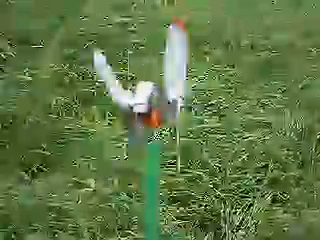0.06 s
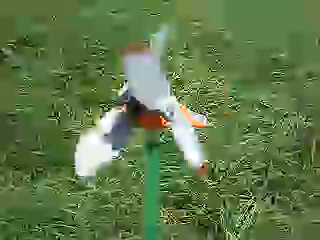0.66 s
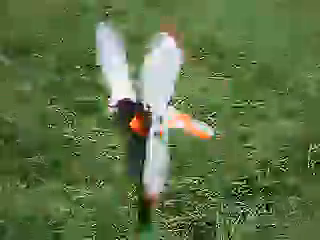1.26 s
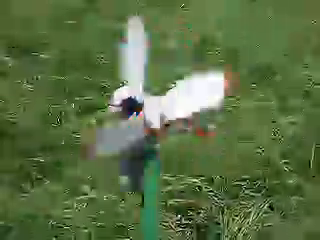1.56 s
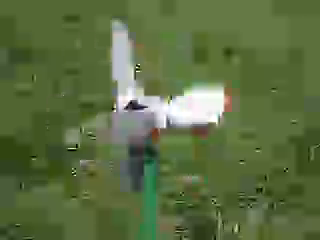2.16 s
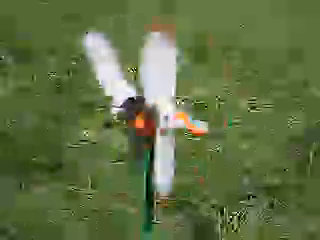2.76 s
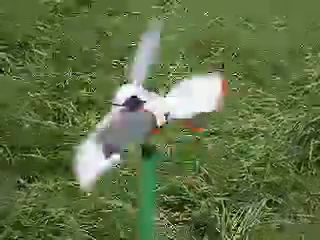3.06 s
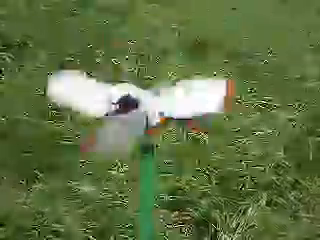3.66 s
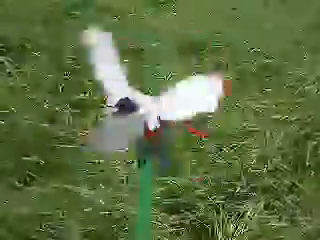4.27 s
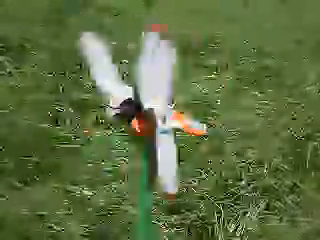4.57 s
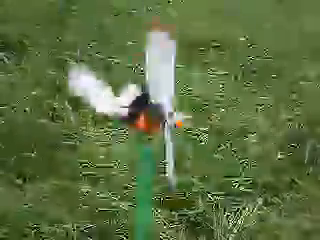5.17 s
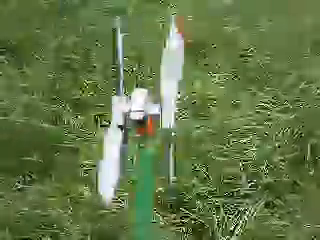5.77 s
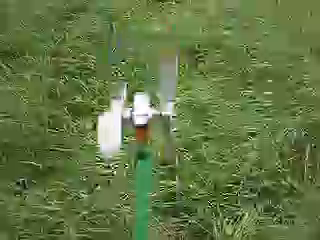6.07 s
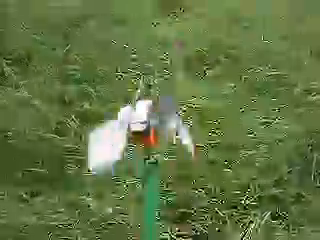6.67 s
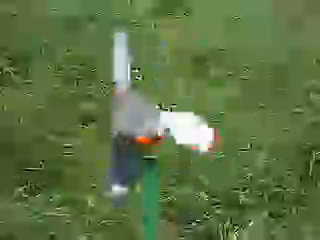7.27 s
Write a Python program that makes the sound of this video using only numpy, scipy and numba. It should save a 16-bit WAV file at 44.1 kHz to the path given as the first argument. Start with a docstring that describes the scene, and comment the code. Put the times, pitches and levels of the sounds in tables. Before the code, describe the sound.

Wind buffets the microphone in a garden from the start, with low thumps and a hard gust at about 0.4 seconds, over a steady airy hiss. From 0.8 seconds a wooden whirligig just in front begins to clack as its two loose propellers knock on their axles. The clacks are small, dry and irregular, often bunched, some slightly hollow, with a faint rattling chatter between them. More gusts hit between 1.5 and 2 seconds. The clacking grows busier from about 2.5 seconds while the wind builds to another strong burst around 3.6 seconds. The strongest gusts briefly push everything else down. After 4 seconds the wind eases and the quick clacks continue, sounding sharpest near 6 seconds. They then become sparser, with a few light puffs of wind and the hiss, until the end at about 7.4 seconds.

```python
"""A wooden whirligig spins on a stake in a garden. From the start, gusts and single eddies buffet the
microphone over a steady hiss. From 0.8 s the hubs of two loose propellers knock on their axles:
small dry clacks, often in bunches, amid a chatter of tiny slips. After 4 s the wind eases and the
clacks go on, hardest-edged near 6 s as the whirligig swings head-on. Throughout, the camera's
limiter ducks everything under the strongest gusts."""
import sys
import numpy as np
from scipy import signal
from scipy.fft import rfft, irfft
from scipy.io import wavfile
from scipy.ndimage import uniform_filter1d
from numba import njit

SR = 44100
rng = np.random.default_rng(int(sys.argv[2]) if len(sys.argv) > 2 else 0)


def wav_record(signal):
    """Record a signal, one row per channel, as 16-bit PCM in the file named by sys.argv[1]."""
    frames = np.transpose(np.atleast_2d(signal))
    bounded = np.clip(frames, -1, 1)
    # unit amplitude maps onto the largest positive 16-bit level
    quanta = np.round(bounded * 32767).astype(np.int16)
    wavfile.write(sys.argv[1], SR, quanta)


N = 326781

# hub hits on the axle: t/s, level/dB, hollow ring near 2 kHz/dB
KNOCKS = [(.7906, -36, 7), (0.9574, -31.5, -4), (1.0406, -36, 10), (1.526, -30, 15), (1.6072, -31.5, 1),
          (1.7499, -35, 10), (1.8007, -30.5, -2), (1.8224, -29, -12), (1.8334, -31, -3), (1.9836, -32, 7),
          (2.0937, -27, 3), (2.2407, -31.5, 8), (2.487, -29, -3), (2.5042, -26, -11), (2.5443, -29, 5.5),
          (2.606, -32, -16), (2.6823, -28.5, 1), (2.723, -28.5, 1), (2.7557, -30, 3), (2.8545, -28, 1),
          (2.8726, -24, -13), (2.906, -32.5, 7), (2.9297, -25, -16), (2.9817, -29, -8), (3.085, -32, 7),
          (3.152, -27, 0), (3.172, -27, -3), (3.1931, -22, 1), (3.275, -24, -7), (3.2873, -29, -14),
          (3.328, -31, -10), (3.3393, -25.5, -5), (3.434, -27.5, -7), (3.4498, -26.5, -1),
          (3.528, -25.5, -7), (3.552, -32.5, 9), (3.6027, -26.5, 4), (3.771, -34, 4), (3.9354, -31, 5),
          (4.124, -29.5, 1), (4.293, -31.5, 3), (4.317, -28, 6), (4.354, -30, 6), (4.3797, -25, 0.5),
          (4.3994, -29.5, 7), (4.459, -36, 16), (4.5115, -25.5, 1), (4.5362, -24.5, -5),
          (4.6317, -32.5, 11), (4.6597, -33, -12), (4.6855, -25, -6.5), (4.8095, -33.5, 4),
          (4.864, -30, -2), (4.8755, -22, -4.5), (4.909, -27, 3), (4.989, -26, -13), (5.0358, -27.5, -2),
          (5.049, -27, -6), (5.067, -29, -8), (5.1338, -31.5, -5), (5.1744, -27, -3), (5.194, -27.5, -4),
          (5.206, -29.5, -15), (5.2448, -28.5, -28), (5.2865, -34, -8), (5.306, -32.5, -6),
          (5.363, -34, -7), (5.4132, -32.5, -10), (5.44, -30, -1), (5.4514, -35, -6), (5.5057, -31.5, -17),
          (5.577, -29, -9), (5.593, -25, -2), (5.6746, -31.5, 0), (5.7538, -27, -12), (5.7768, -27, -2),
          (5.8183, -28.5, -8), (5.8416, -29, -12), (5.9148, -32, -5), (5.9384, -28, -4),
          (5.9603, -25.5, -9), (6.048, -31, -8), (6.1097, -27.5, -7), (6.2997, -33, -8), (6.363, -37, 4),
          (6.4073, -31, -9), (6.5111, -32.5, -12), (6.778, -33.5, 10), (6.7924, -31.5, -4),
          (7.011, -30, -5), (7.249, -31.5, 2), (7.2694, -25.5, 1), (7.2815, -34, 6), (7.3941, -34, 0)]
# blade and hub modes: f/Hz, level/dB, t60/s
WOOD_MODES = [(1316, 4, 0.018), (1980, 3, 0.14), (2155, 8, 0.05), (2713, 5, 0.074), (3100, -58, 0.037),
              (3620, -1.5, 0.16), (4107, 7.5, 0.055), (4760, 8, 0.017), (5560, 4, 0.06),
              (6420, -11.5, 0.0036), (7080, 15, 0.0022), (9430, 4, 0.0011), (10800, -3, 0.0031)]


def undb(db):
    return 10 ** (np.asarray(db) / 20)


def unit_rms(x):
    return x / np.sqrt(np.mean(x ** 2) + 1e-20)


def curve(rows):
    """Join (t/s, value) rows linearly."""
    return np.interp(np.arange(N) / SR, *np.transpose(rows))


def add(out, start_s, x):
    """Mix x into out from start_s on."""
    i = int(start_s * SR)
    x, i = x[max(-i, 0):], max(i, 0)
    out[i:i + len(x)] += x[:max(N - i, 0)]


def colour(x, points):
    """Filter by (f/Hz, level/dB) points."""
    hz, db = np.transpose(points)
    bins_hz = np.maximum(np.fft.rfftfreq(len(x), 1 / SR), 1)
    return irfft(rfft(x) * undb(np.interp(np.log(bins_hz), np.log(hz), db)), len(x))


def wander(rate_hz):
    """Twice-smoothed random steps, rms 1."""
    hold = int(SR / rate_hz)
    steps = np.repeat(rng.standard_normal(N // hold + 1), hold)
    return unit_rms(uniform_filter1d(uniform_filter1d(steps, hold), hold)[:N])


@njit
def lowpass(x, corner_hz, damping):
    """State-variable low-pass, moving corner."""
    y, band_state, low_state = np.empty(len(x)), 0., 0.
    for i in range(len(x)):
        g = np.tan(np.pi * corner_hz[i] / SR)
        band = (band_state + g * (x[i] - low_state)) / (1 + g * (g + damping))
        y[i] = low_state + g * band
        band_state, low_state = 2 * band - band_state, 2 * y[i] - low_state
    return y


@njit
def envelope(x, attack_s, release_s):
    """Attack/release follower of |x|."""
    y, level = np.empty(len(x)), 0.
    for i in range(len(x)):
        lag_s = attack_s if abs(x[i]) > level else release_s
        level += (abs(x[i]) - level) / (SR * lag_s)
        y[i] = level
    return y


def mic_low_cut(x, corner_hz=130, q=2):
    """Microphone bass cut; rings a cycle or two after each push."""
    w = 2 * np.pi * corner_hz
    x = signal.lfilter(*signal.butter(1, 40, "high", fs=SR), x)
    return signal.lfilter(*signal.bilinear([1, 0, 0], [1, w / q, w * w], SR), x)


def gust_level_db(swell_s=0.01, fade_s=0.02):
    """Each puff swells, holds and fades; its power adds to the breeze."""
    # puffs at the microphone: t/s, hold/s, level/dB
    puffs = [(0, 0.051, -15.5), (0.068, 0.14, -32.5), (0.357, .06, -31), (0.437, 0.025, -8.5),
             (0.637, 0.02, -28), (0.757, 0.065, -37), (1.213, 0.031, -29), (1.326, 0.041, -27),
             (1.46, 0.053, -31.5), (1.538, 0.027, -19), (1.618, 0.039, -15), (1.8, 0.057, -30.5),
             (1.906, 0.032, -21.5), (2.158, 0.079, -28), (2.29, 0.16, -22.5), (2.561, 0.041, -23.5),
             (2.75, 0.023, -21.5), (2.83, 0.028, -27.5), (3.068, 0.088, -16.5), (3.184, 0.078, -17.5),
             (3.368, 0.024, -19), (3.508, 0.037, -18.5), (3.561, 0.079, -10.5), (3.726, 0.054, -16.5),
             (3.968, 0.074, -22.5), (4.13, .035, -26), (4.622, 0.04, -28.5), (5.871, 0.1, -32.5),
             (6.22, .08, -32.5), (6.338, 0.041, -26.5), (6.53, 0.013, -32), (7.018, .025, -34),
             (7.117, .025, -37.5), (7.272, 0.011, -38)]
    # breeze between puffs: t/s, level/dB
    breeze = [(0, -50), (.7, -37.5), (.9, -47.5), (1.12, -40), (1.22, -35.5), (1.85, -37), (2.08, -45),
              (2.4, -30), (2.68, -39.5), (3, -45.5), (3.6, -26), (4.2, -38.5), (4.38, -50.5), (5.75, -51.5),
              (5.95, -44.5), (6.7, -44), (7.41, -45)]
    t, power = np.arange(N) / SR, undb(curve(breeze)) ** 2
    for start_s, hold_s, db in puffs:
        shape = np.exp(-np.maximum(start_s - t, 0) / swell_s - np.maximum(t - start_s - hold_s, 0) / fade_s)
        power += (undb(db) * shape) ** 2
    return 10 * np.log10(power)


def wind(corner_hz=235, roar_above_db=-18, flutter_db=2.5, gain_db=-1):
    """Turbulence at the microphone port: a low flutter; hard gusts break into small eddies and roar."""
    level_db = gust_level_db()
    fineness = 0.12 * np.clip(level_db - roar_above_db, 0, 6) + .23 * wander(60)
    cutoff_hz = np.clip(corner_hz * np.exp(fineness), 40, 2000)
    eddies = colour(rng.standard_normal(N),
                    [(20, -12), (70, 7.5), (130, -3), (220, -2), (400, -4.5), (1000, -4)])
    for _ in range(2):
        eddies = lowpass(eddies, cutoff_hz, np.sqrt(2))
    pressure = mic_low_cut(eddies)
    pressure /= np.sqrt(uniform_filter1d(pressure ** 2, size=1100) + 1e-12)  # 25 ms rms
    return pressure * undb(level_db + flutter_db * wander(70) + gain_db)


def hiss():
    """Even hiss of garden air and microphone."""
    # noise shape: f/Hz, level/dB
    spectrum = [(25, -5), (50, 16.5), (95, -25), (128, 13), (165, -10), (250, 6), (500, 5.5), (1000, 2),
                (1700, -2.5), (3500, -3.5), (6500, -2), (9500, -6.5), (12500, -16.5), (15500, -29)]
    # slow drift: t/s, level/dB
    levels = [(0, -45), (.3, -42.5), (2.5, -42.5), (3.4, -43), (3.9, -45), (5.7, -43), (6.3, -42.5),
              (7.41, -42.5)]
    return unit_rms(colour(rng.standard_normal(N), spectrum)) * undb(curve(levels))


def buffets():
    """An eddy slaps the microphone: one smooth pressure bump, shorter at higher pitch."""
    # single eddies: t/s, peak level/dB, nominal f/Hz
    eddies = [(.003, -9, 264), (0.018, -6, 150), (.044, -10.5, 170), (.432, -1.5, 200), (.438, 4.5, 340),
              (.452, 5, 272), (.642, -10, 238), (0.763, -15, 154), (0.824, -21, 175), (1.251, -19.5, 150),
              (1.374, -17, 165), (1.539, -13.5, 150), (1.623, -11.5, 190), (1.909, -1.5, 352),
              (2.181, -13.5, 161), (3.075, -21, 165), (3.123, -10, 195), (3.202, -5.5, 197),
              (3.393, -14, 197), (3.563, 0.5, 244), (3.643, -10, 240), (3.664, 0, 280), (3.732, -5, 227),
              (4.057, -12.5, 170), (4.124, -11, 155), (4.645, -18, 130), (5.958, -11, 246),
              (6.342, -16, 252), (6.375, -18.5, 200), (7.04, -21, 145)]
    out, t = np.zeros(N), np.arange(-600, 2400) / SR
    for at_s, db, hz in eddies:
        bump = mic_low_cut(np.exp(-.5 * (t * max(hz, 100) / .235) ** 2))
        add(out, at_s + t[0], undb(db) * bump / np.abs(bump).max())
    return out


def wood_response(force, mode_gains_db, mode_ratios, wood_db):
    """Dry crack of a contact plus the wooden modes it drives."""
    # contact crack: f/Hz, level/dB
    spectrum = [(400, -18), (1200, -5), (2000, -1), (4000, 0), (6700, 2), (8500, -1), (10000, -3),
                (12000, -9), (14000, -16), (16000, -22)]
    crack, wood = colour(force, spectrum), 0
    for (hz, db, t60_s), extra_db, ratio in zip(WOOD_MODES, mode_gains_db, mode_ratios):
        pole = np.exp((2j * np.pi * hz * ratio - np.log(1000) / t60_s) / SR)
        mode = np.sqrt(1 - abs(pole) ** 2) * signal.lfilter([1], [1, -pole], crack).imag
        wood += undb(db + extra_db) * mode
    return undb(wood_db) * unit_rms(wood) + unit_rms(crack)


def shifting_spots(x, spread_db=4, rate_hz=120):
    """Slips land on changing spots of the wood: six band levels wander."""
    spectrum, out = rfft(x), 0
    band = np.digitize(np.fft.rfftfreq(N, 1 / SR), [2400, 3400, 4800, 6600, 9200])
    for k in np.unique(band):
        out += irfft(spectrum * (band == k), N) * undb(spread_db * wander(rate_hz))
    return out


def chatter(slips_per_s=190, slip_s=.0012, scatter_db=3, rattle_db=-14.5, gain_db=-4.5):
    """Tiny uneven slips of the hubs on their axles, swelling to a short rattle at each knock."""
    # chatter as the propellers speed up and slow down: t/s, level/dB
    levels = [(0, -57), (1.5, -45.5), (2.4, -48.5), (2.85, -40), (3.45, -47), (4.05, -57), (4.35, -44.5),
              (4.8, -47.5), (5.9, -51.5), (6.9, -45.5), (7.41, -54)]
    strength, t = undb(curve(levels)), np.arange(-SR // 10, SR // 2) / SR
    rattle = np.exp(np.minimum(t / 0.004, -t / 0.022))  # 4 ms rise, 22 ms decay
    for at_s, db, _ in KNOCKS:
        add(strength, at_s + t[0], undb(db + rattle_db) * rattle)
    onsets = rng.random(N) < slips_per_s / SR
    slips = onsets * undb(scatter_db * np.minimum(rng.exponential(size=N), 2.5))
    force = signal.lfilter([1], [1, -np.exp(-1 / (slip_s * SR))], slips) * rng.standard_normal(N)
    scrapes = wood_response(force, np.zeros(len(WOOD_MODES)), np.ones(len(WOOD_MODES)), wood_db=-2)
    return unit_rms(shifting_spots(scrapes)) * strength * undb(gain_db)


def knocks(contact_s=0.00073, bounce_db=-8, tail_db=-19, spot_db=2.6, spot_detune=.028, gain_db=-4):
    """A hub hits its axle, scrapes and bounces; each spot rings the modes differently."""
    # swing round the stake: t/s, facing (0 side-on, 1 head-on)
    facing = [(0, 0.61), (1.2, 0.55), (3.3, 0.084), (4.8, 0.36), (5.6, 0.86), (6.6, 0.9), (7.41, 0.16)]
    out, t = np.zeros(N), np.arange(-128, 2944) / SR
    tail = undb(tail_db) * (t > 0) * np.exp(-t / .008)
    for at_s, db, hollow_db in KNOCKS:
        bounce_s = rng.uniform(0.0023, 0.00585)
        hit, bounce = (np.maximum(t - delay_s, 0) / contact_s for delay_s in (0, bounce_s))
        contact = hit * np.exp(1 - hit) + undb(bounce_db) * bounce * np.exp(1 - bounce)
        force = rng.standard_normal(len(t)) * (contact + tail)
        spot, stretch = rng.standard_normal((2, len(WOOD_MODES)))
        clack = wood_response(force, spot_db * spot, 1 + spot_detune * stretch, wood_db=1.5)
        # flat hits bring out the hollow body; the hard edge carries best head-on
        body_db, middle_db = 2.5 + 0.37 * hollow_db, -.25 * hollow_db
        edge_db = 11 * np.interp(at_s, *np.transpose(facing))
        clack = colour(clack, [(2200, hollow_db), (2600, body_db), (4300, body_db), (5200, middle_db),
                               (7200, middle_db), (8500, edge_db), (10000, edge_db), (14000, edge_db - 6)])
        peak_rms = np.sqrt(uniform_filter1d(clack ** 2, size=132).max())  # 3 ms window
        add(out, at_s + t[0], clack * undb(db + gain_db) / peak_rms)
    return out


def scene():
    """Wind and hiss at the microphone, the whirligig just in front; mono."""
    return (wind() + hiss() + buffets() + chatter() + knocks())[None]


def record(dry):
    """The camera limits and clips the gusts, notches the treble and cuts the top."""
    # narrow treble dip: f/Hz, level/dB
    notch = [(7100, 0), (7500, -4), (7730, -10), (7850, -23), (7980, -10), (8250, 0)]
    threshold_db, ceiling, top_hz = -10.5, .707, 15750
    reduction = 1 - 1 / np.maximum(np.abs(dry[0]) / undb(threshold_db), 1)
    limited = dry[0] * (1 - envelope(reduction, attack_s=0.0039, release_s=.1))
    notched = colour(np.clip(limited, -ceiling, ceiling), notch)
    return signal.sosfilt(signal.ellip(10, .2, 70, top_hz, fs=SR, output="sos"), notched)[None]


dry = scene()
out = record(dry)
wav_record(out)
```